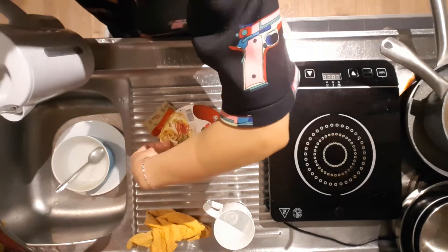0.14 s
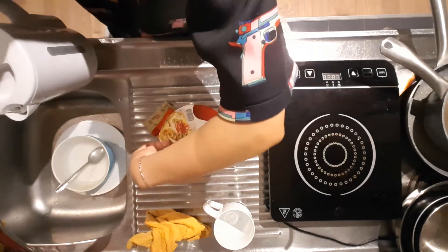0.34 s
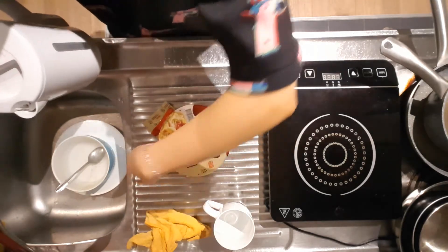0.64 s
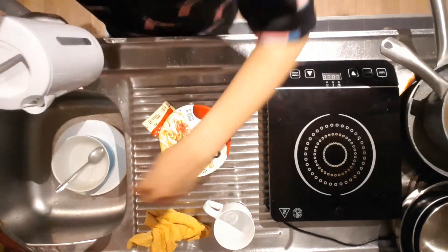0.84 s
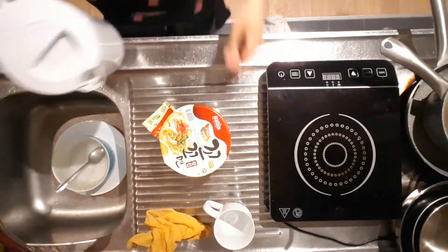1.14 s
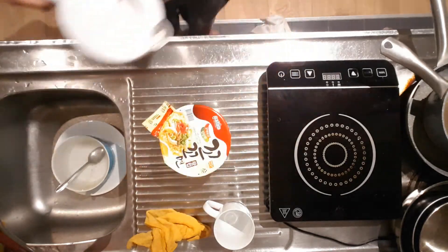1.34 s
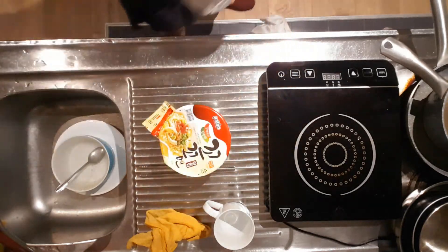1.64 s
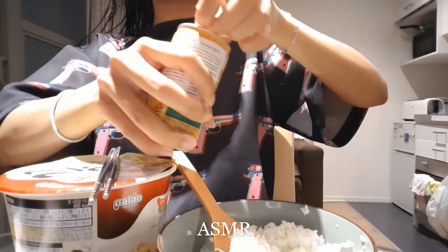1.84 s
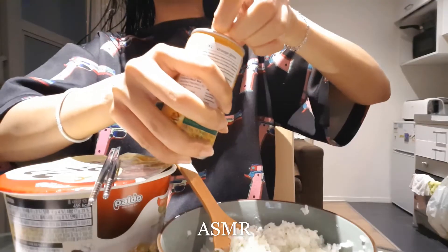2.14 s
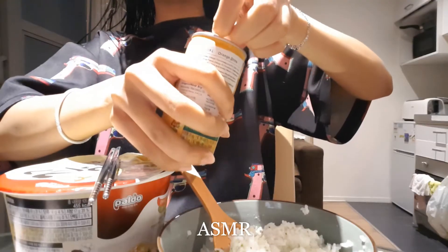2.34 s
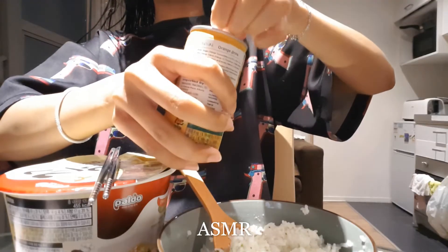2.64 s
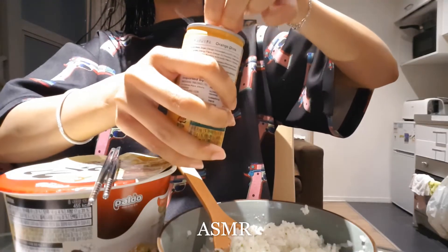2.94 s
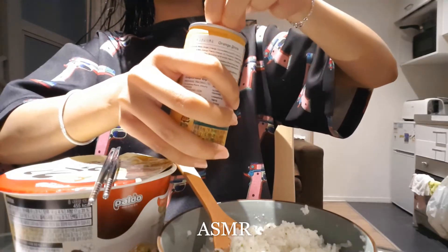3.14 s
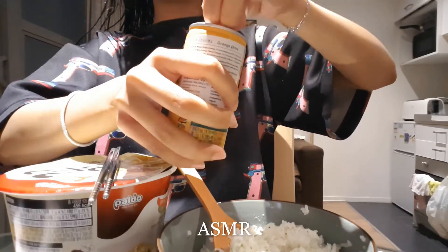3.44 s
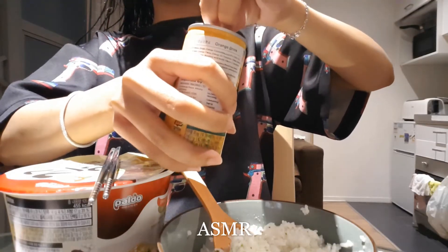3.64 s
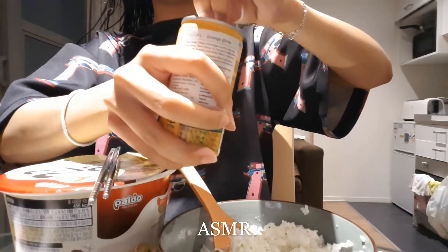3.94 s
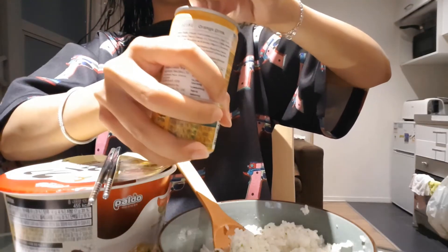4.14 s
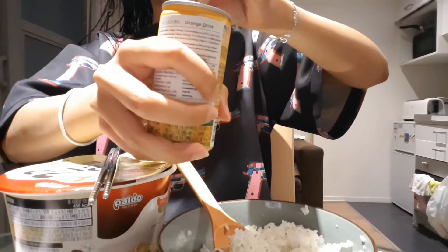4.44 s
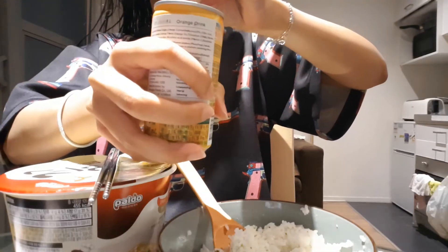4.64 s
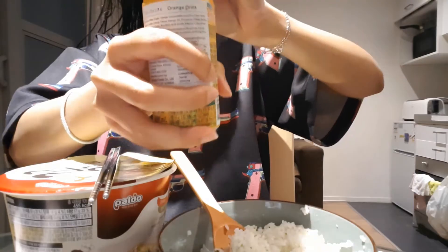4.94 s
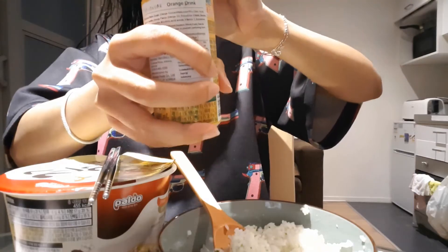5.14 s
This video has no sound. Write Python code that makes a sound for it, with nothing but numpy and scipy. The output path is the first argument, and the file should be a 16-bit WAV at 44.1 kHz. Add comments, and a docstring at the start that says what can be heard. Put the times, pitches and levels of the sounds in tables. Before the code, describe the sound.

From 0 to 1.8 s, a quiet kitchen sink: low room air, soft dull footfalls at the start and around 0.5-0.65 s, light foot scuffs and sleeve rustles, and thin whistling sizzle from a hot kettle, strongest at 1.0-1.4 s. A slightly clearer rustle and scuff come at 1.7 s, then the background fades quickly into a hushed table setting with faint low hum. At 2.37 s a sharp, bright metallic crack bursts very close, with a forceful gas jet lasting about 0.06 s, another click at 2.43 s and a wet fizz dying within half a second. Tiny ticks follow around 2.7-3.0 and 3.96 s as the hum rises slightly. At 4.37-4.41 s rapid crisp tearing snaps end in a loud, punchy pop with hollow can ring, close reflections and a short small-room tail. A very soft plink at 4.7 s, then near silence with faint room air slowly returning.

```python
"""Room air at a kitchen sink with soft footfalls, a rustling sleeve and the faint sizzle of a hot kettle (noise).
Then a drone and room air at a table, where a drink can is opened close to a stereo microphone.
The tab pricks the lid (noise bursts through resonances); gas jets out and dies away in a wet fizz (noise).
After faint ticks, two seconds later, the score line tears and the flap snaps in with a pop (bursts and
ringing sines), heard with near bounces and a small room; a soft plink follows."""
import sys
import numpy as np
from scipy import signal
from scipy.fft import rfft, irfft, next_fast_len
from scipy.io import wavfile

SR = 44100
rng = np.random.default_rng(int(sys.argv[2]) if len(sys.argv) > 2 else 0)


def wrap_up_sound(samples):
    """Save the sound to the file named by the first command line argument, as 16-bit audio."""
    columns = np.atleast_2d(samples).T
    # keep every value between -1 and 1, then stretch to whole-number steps
    tamed = np.clip(columns, -1, 1)
    steps = np.round(tamed * 32767).astype(np.int16)
    wavfile.write(sys.argv[1], SR, steps)


N = 232801
TIME = np.arange(N) / SR
POP_S = 4.4131


def from_db(db):
    """Decibels to amplitude gain."""
    return 10 ** (np.asarray(db) / 20)


def rms_one(x):
    """Scale to rms 1."""
    return x / np.sqrt(np.mean(x ** 2) + 1e-20)


def at_hz(points, hz):
    """Interpolate a table on a log-frequency axis."""
    points = np.array(points)
    return np.interp(np.log(np.maximum(hz, 1)), np.log(points[:, 0]), points[:, 1])


def colour(x, spectrum):
    """Causal minimum-phase filter with the given (hz, db) response, via the folded cepstrum."""
    size = 2 * next_fast_len(x.shape[-1])
    gain = from_db(at_hz(spectrum, np.fft.rfftfreq(size, 1 / SR)))
    cepstrum = irfft(np.log(gain))
    cepstrum[1:size // 2] *= 2
    cepstrum[size // 2 + 1:] = 0
    response = np.exp(rfft(cepstrum))
    return irfft(rfft(x, size) * response)[..., :x.shape[-1]]


def highpass(x, order, hz):
    """Butterworth bass cut."""
    return signal.sosfilt(signal.butter(order, hz, "high", fs=SR, output="sos"), x)


def ring(x, hz, t60_s):
    """Two-pole resonator: a unit click starts a decaying sine of initial height 1."""
    radius = np.exp(-np.log(1000) / (t60_s * SR))
    angle = 2 * np.pi * hz / SR
    poles = [1, -2 * radius * np.cos(angle), radius * radius]
    return signal.lfilter([0, np.sin(angle)], poles, x + 1e-18)


def resonate(x, modes):
    """Parallel bandpass resonances (hz, width_hz, peak_db); widths under 150 Hz are raised to 150."""
    out = 0
    for hz, width_hz, db in modes:
        radius = np.exp(-np.pi * max(width_hz, 150) / SR)
        poles = [1, -2 * radius * np.cos(2 * np.pi * hz / SR), radius * radius]
        peak_one = (1 - radius * radius) / 2
        out = out + from_db(db) * peak_one * signal.lfilter([1, 0, -1], poles, x + 1e-18)
    return out


def add(out, start_s, x):
    """Mix x into out from start_s."""
    start = max(round(start_s * SR), 0)
    out[..., start:start + x.shape[-1]] += x[..., :N - start]


def diffuse(spectrum):
    """Stereo noise from all around, rms 1, with left-right correlation set by frequency."""
    # left-right correlation of diffuse sound: hz, correlation
    likeness = [(100, 0.4), (400, 0.11), (1000, .3), (2500, 0.016), (15000, 0.018)]
    mid, side = rfft(rng.standard_normal((2, next_fast_len(N, True))))
    hz = np.linspace(0, SR / 2, len(mid))
    alike = np.clip(at_hz(likeness, hz), -1, 1)
    pair = np.sqrt(1 + alike) * mid + np.sqrt(1 - alike) * side * [[1], [-1]]
    return rms_one(irfft(pair * from_db(at_hz(spectrum, hz)))[:, :N])


def near_noise(size, alike):
    """White noise from the can: a shared part, and a part scattered by the hands to each side."""
    alike = np.clip(alike, 0, 1)
    shared = np.sqrt(alike) * rng.standard_normal(size)
    return shared + np.sqrt(1 - alike) * rng.standard_normal((2, size))


def flutter(rate_hz, depth_db):
    """Random gain: noise lowpassed at rate_hz, with an rms swing of depth_db."""
    lowpass = signal.butter(2, rate_hz, fs=SR, output="sos")
    return from_db(depth_db * rms_one(signal.sosfilt(lowpass, rng.standard_normal(N))))


def swell(start_s, db, attack_s, fall_db_per_s, hold_s=0):
    """Gain over time: linear attack, hold, then a steady fall in dB, by 200 dB at most."""
    age_s = TIME - start_s
    fall_db = np.minimum(fall_db_per_s * np.maximum(age_s - attack_s - hold_s, 0), 200)
    return np.clip(age_s / attack_s, 0, 1) * from_db(db - fall_db)


def together(gains):
    """Overlapping swells of one noise add in power."""
    return np.sqrt(sum(gain ** 2 for gain in gains))


def kettle_sizzle():
    """Steam noise through fluttering resonances swells each time the hot kettle's water sloshes."""
    # whistling resonances: hz, width_hz, relative_db
    whistles = [(4550, 150, -7), (7520, 300, -12), (8450, 170, -4), (10200, 180, -10), (11400, 820, -11.5),
                (13370, 260, -3), (13600, 1800, -9.5), (15700, 970, -4.5)]
    # sloshes: start_s, level_db
    sloshes = [(.515, -60), (.6, -57.5), (.94, -59), (1.0, -53.5), (1.16, -50), (1.37, -53)]
    steam = rng.standard_normal((2, N))
    sizzle = sum(resonate(steam, [mode]) * flutter(rate_hz=8.1, depth_db=2.5) for mode in whistles)
    sloshing = together(swell(s, db, attack_s=.034, fall_db_per_s=61) for s, db in sloshes)
    return sloshing * rms_one(sizzle)


def rubbing():
    """Friction noise, roughened by a fast flutter, as a sleeve brushes past and feet scuff the floor."""
    # sleeve and floor friction spectra: hz, relative_db
    rustle_colour = [(150, -15), (600, -5), (2000, 2.5), (4000, -1), (7000, -2.5), (9500, -12.5),
                     (12500, -8.5), (15500, -17)]
    scuff_colour = [(80, -23), (280, 4), (550, -2.5), (850, -5.5), (1400, -6.5), (2000, -7), (2900, -6.5),
                    (4500, -19.5), (9000, -36)]
    # sleeve brushes and foot scuffs: start_s, level_db, attack_s
    brushes = [(0, -71.5, 0.03), (.56, -63.5, 0.13), (1.143, -51, 0.038), (1.37, -64, 0.13),
               (1.695, -46, 0.039)]
    scuffs = [(.21, -73, 0.0058), (.49, -65, 0.022), (.58, -60.5, .06), (.99, -60, 0.039),
              (1.14, -60, 0.022), (1.691, -44, 0.0065)]
    brushing = together(swell(s, db, attack_s, fall_db_per_s=104) for s, db, attack_s in brushes)
    scuffing = together(swell(s, db, attack_s, fall_db_per_s=153) for s, db, attack_s in scuffs)
    friction = brushing * diffuse(rustle_colour) + scuffing * diffuse(scuff_colour)
    return flutter(rate_hz=45, depth_db=1.0) * friction


def footfalls():
    """Soft heel contacts, short smooth pulses, set floorboard modes ringing."""
    # footfalls: start_s, pulse_db
    steps = [(.003, -44.5), (0.506, -47.5), (0.599, -42), (.655, -47)]
    # floorboard modes: hz, gain_db, t60_s
    floorboards = [(118.4, -3, 0.3), (169, -1.5, 0.19)]
    heels, soft_contact = np.zeros(N), signal.windows.hann(SR // 200)
    for start_s, db in steps:
        add(heels, start_s, from_db(db) * soft_contact / soft_contact.sum())
    return sum(from_db(db) * ring(heels, hz, t60_s) for hz, db, t60_s in floorboards)


def at_the_sink(air_db=-61):
    """Sizzle, rubbing and footfalls over diffuse room air."""
    # room air spectrum: hz, relative_db
    sink_air = [(15, -49), (25, -3.5), (126, -4.5), (164, -2.5), (221, -12.5), (469, -12), (631, -19.5),
                (722, -17.5), (1710, -23), (4500, -29.5), (9300, -39.5), (15500, -30)]
    return kettle_sizzle() + rubbing() + footfalls() + from_db(air_db) * diffuse(sink_air)


def appliance_drone(rumble_db=2.5):
    """A kitchen appliance: steady sine partials plus low rumble noise under one level curve."""
    # drone level: time_s, level_db
    drone_level = [(2.0, -76), (3.05, -74), (3.25, -70), (4.4, -66), (4.52, -77.5)]
    # hum partials: hz, relative_rms_db
    partials = [(54, -7), (110.5, -3.5), (164.5, -0.5), (246, -3.5), (329, -0.5)]
    # rumble spectrum: hz, relative_db
    rumble_colour = [(15, -11), (50, 0.5), (120, -2.5), (300, -4.5), (450, -10.5), (800, -29),
                     (3000, -55.5)]
    hum = 0
    for hz, db in partials:
        phase_cycles = rng.random()
        hum = hum + from_db(db) * np.sqrt(2) * np.sin(2 * np.pi * (hz * TIME + phase_cycles))
    gain = from_db(np.interp(TIME, *np.transpose(drone_level)))
    return gain * (hum + from_db(rumble_db) * diffuse(rumble_colour))


def hush(depth_db=-11.5, fall_s=.1, hold_s=.57, recover_db_per_s=51.5):
    """Background gain: sinks at the pop, stays low for a while and swells back."""
    age_s = TIME - POP_S
    sunk_db = depth_db * np.clip(age_s / fall_s, 0, 1)
    regained_db = recover_db_per_s * np.maximum(age_s - fall_s - hold_s, 0)
    return from_db(np.minimum(sunk_db + regained_db, 0))


def at_the_table(air_db=-64.5):
    """Diffuse room air and the drone, both sinking for a while after the pop."""
    # room air spectrum: hz, relative_db
    table_air = [(15, -41), (25, -12), (113, -9.5), (193, -15.5), (233, -12.5), (297, -11), (340, -3),
                 (582, -11.5), (703, -14.5), (970, -15), (5580, -29.5), (9500, -34.5), (15500, -27.5)]
    return hush() * (from_db(air_db) * diffuse(table_air) + appliance_drone())


def gas_jet():
    """Turbulence noise: a full-pressure jet through the pinhole until liquid chokes it, then a thin leak."""
    # jet spectrum: hz, relative_db
    jet_colour = [(60, -40), (150, -21.5), (300, -13), (550, -11.5), (1000, -18), (2000, -1), (3100, -14),
                  (4500, -6), (5500, 1), (8000, -5.5), (12000, 2.5), (13500, -6.5), (15500, 0.5)]
    start_s, attack_s, hold_s = 2.364, .0096, .048
    jet = rms_one(colour(near_noise(N, alike=.43), jet_colour))
    full_pressure = swell(start_s, -18, attack_s, fall_db_per_s=3000.5, hold_s=hold_s)
    leak = swell(start_s, -41.5, attack_s, fall_db_per_s=330, hold_s=hold_s)
    return together([full_pressure, leak]) * jet


def wet_fizz():
    """Noise sputtering as liquid closes the slit: swells as the jet chokes, sinks with can pressure."""
    # fizz spectrum: hz, relative_db
    fizz_colour = [(80, -53.5), (400, -21), (1500, -19.5), (3200, -17.5), (3900, -8.5), (4600, -4),
                   (5200, -2), (5700, -10.5), (6300, -12), (7500, -23), (10000, -21.5), (15500, -22.5)]
    # short bursts in the fizz, the second an echo of the crack off the table: start_s, level_db
    bursts = [(2.426, -13), (2.4335, -15)]
    sputter = near_noise(N, alike=.45) * flutter(rate_hz=330, depth_db=1.5)
    fizz = rms_one(highpass(colour(sputter, fizz_colour), 2, 500))
    flows = [swell(2.395, -27.5, attack_s=.021, fall_db_per_s=118)]
    flows += [swell(s, db, attack_s=.0025, fall_db_per_s=4000) for s, db in bursts]
    return together(flows) * fizz


def gas():
    """The jet points a little left, the fizz a little right."""
    lean = from_db([[.7], [-.7]])
    return gas_jet() * lean + wet_fizz() / lean


def crumble(t, fade_s, snap, alike=.46):
    """A snap and a fading shower of tiny fractures, flattened towards an even spectrum."""
    fading = np.exp(-t / fade_s)
    force = rms_one(near_noise(len(t), alike) * fading) + snap * rms_one(1. * (t == 0))
    for _ in range(2):
        spectrum = rfft(force)
        flat = irfft(spectrum / (np.abs(spectrum) + 1e-9), len(t))
        force = flat * fading ** .2   # flattening spreads it in time; fade again
    return force


def lid(lowest_hz=900):
    """Bursts from the lid, and one echo of its tear, each direct and through the lid's resonances."""
    # breaks, ticks and, at 4.3925 s, the table's echo of the tear: start_s, level_db (over one ms),
    # crumble_ms (0.6 at least), tilt_db (per octave above 2 kHz), ring_db (relative to the direct sound)
    bursts = [(2.369, -8.5, 2.9, 1.5, 2), (2.4160, -20, .8, -5.5, 7.5), (2.4263, -11, 1.24, 0.5, 3),
              (2.7110, -49.5, 2.0, -15, -5), (2.758, -45, 3.1, -11, -2), (2.957, -36, 1.2, -3, -8),
              (3.9620, -46, 1.1, -5, 6), (4.2780, -58.5, 6.0, -3, 2.5), (4.3700, -26.5, 1.0, -0.5, -3),
              (4.3716, -18, 1.5, 2.5, -2), (4.3831, -7.5, 2.2, 0.5, 7), (4.3864, -12, 2.5, -1.5, 7.5),
              (4.3925, -16, 1.5, -2.5, 12), (4.4105, -14, 2.0, -6.5, 0.5)]
    # aluminium lid modes, damped by the fingers: hz, width_hz, relative_db
    lid_modes = [(1986.5, 300, -7.5), (3774, 130, 5.5), (4230, 300, 2), (5000, 360, 3), (5900, 500, -5),
                 (7400, 600, -9), (11946, 530, -8.5), (14700, 2500, -9)]
    out, t = np.zeros((2, N)), TIME[:SR // 10]
    one_ms = np.sqrt(SR / 1000 / len(t))   # rms that packs the energy of one ms at rms 1
    for start_s, db, crumble_ms, tilt_db, ring_db in bursts:
        force = crumble(t, max(crumble_ms, .6) / 1000, snap=.2)
        force = highpass(force, 2, lowest_hz)   # a small lid radiates little bass
        burst = rms_one(force) + from_db(ring_db) * rms_one(resonate(force, lid_modes))
        burst = colour(burst, [(2000, 0), (16000, 3 * tilt_db), (19000, -40)])
        add(out, start_s, from_db(db) * one_ms * rms_one(burst))
    return out


def pop(flap_db=.5, buckle_s=.0035):
    """The flap buckles inward: a crumbling burst, a suck then puffs of air, and ringing air in the can."""
    # flap spectrum: hz, relative_db
    flap_colour = [(100, -22.5), (300, -6.5), (500, -1), (850, -4.5), (1200, 2.5), (1450, -1), (1850, -5),
                   (3200, -1), (4000, -1), (6200, -7.5), (8000, -8), (9300, -15), (11000, -9.5),
                   (15000, -16.5)]
    # air shoved by the flap: delay_s, hz, level_db, t60_s, left_minus_right_db
    puffs = [(0, 540, 1.5, .005, -0.5), (.0009, 159.9, -9, 0.0096, 22.5), (.001, 106, -27.5, .07, 14)]
    # air above the drink: hz, level_db, t60_s
    cavity_modes = [(1160, -28, 0.054), (1330, -25, 0.17), (1468, -30.5, .08), (2970, -29.5, 0.16),
                    (3380, -30, .07)]
    # last soft plink in the can: start_s, hz, level_db, t60_s
    plink = (4.712, 1450, -59, .04)
    out, t = np.zeros((2, N)), TIME[:SR // 2]
    click = 1. * (t == 0)
    one_ms = np.sqrt(SR / 1000 / len(t))
    flap = highpass(colour(crumble(t, buckle_s, snap=0), flap_colour), 2, 600)
    add(out, POP_S, from_db(flap_db) * one_ms * rms_one(flap))
    for (delay_s, hz, db, t60_s, pan_db), sign in zip(puffs, (-1, 1, 1)):
        side_gain = from_db([[db + pan_db / 2], [db - pan_db / 2]])
        add(out, POP_S + delay_s, sign * ring(click, hz, t60_s) * side_gain)
    for hz, db, t60_s in cavity_modes:
        add(out, POP_S, from_db(db) * ring(click, hz, t60_s) * rng.choice([-1, 1]))
    start_s, hz, db, t60_s = plink
    add(out, start_s, from_db(db) * ring(click, hz, t60_s))
    return highpass(out, 1, 45)


def bounces(x):
    """The hands, the table and the nearest walls send back short, smeared, coloured copies."""
    # bounces: delay_s, spread_s, level_db (before colouring)
    near_surfaces = [(.001, .006, -10.5), (.0080, .004, -7.5), (0.0162, .007, -14)]
    # reflection spectrum: hz, gain_db
    bounce_colour = [(150, -17), (700, -8.5), (1300, -1), (5000, 2), (9000, -7.5), (15000, -9)]
    response = np.zeros((2, N))
    for delay_s, spread_s, db in near_surfaces:
        window = signal.windows.hann(int(spread_s * SR))
        smear = rng.standard_normal((2, len(window))) * window
        add(response, delay_s, from_db(db) * smear / np.linalg.norm(smear, axis=1, keepdims=True))
    response = colour(response[:, :SR // 10], bounce_colour)
    return signal.fftconvolve(x, response, axes=1)[:, :N]


def room(x, first_echo_s=.0055, build_s=.012):
    """Dense wall echoes: noise, different at each side, whose bands each fade at their own t60."""
    # reverberation spectrum: hz, gain_db
    room_gain = [(60, -24), (200, -25), (420, -26), (750, -11.5), (1400, -6.5), (4000, -5.5), (7000, -4.5),
                 (9500, -7.5), (15000, -5)]
    # reverberation time: hz, t60_s
    room_t60 = [(150, 0.33), (700, 0.17), (1500, 0.36), (4000, .33), (8000, 0.33), (15000, 0.29)]
    t = TIME[:SR * 3 // 4]
    hz = np.fft.rfftfreq(len(t), 1 / SR)
    echoes = rfft(rng.standard_normal((2, len(t))))
    centres_hz, tail = np.array(room_t60)[:, 0], 0
    build = np.clip((t - first_echo_s) / build_s, 0, 1)
    for share, (_, t60_s) in zip(np.eye(len(centres_hz)), room_t60):
        fading = np.exp(-np.log(1000) * t / t60_s) * build
        band = irfft(echoes * at_hz(np.c_[centres_hz, share], hz), len(t))
        tail = tail + band * fading / np.linalg.norm(fading)
    return signal.fftconvolve(x, colour(tail, room_gain), axes=1)[:, :N]


def scene(change_s=1.836, fade_out_s=.042, fade_in_s=.036, right_lag_samples=4):
    """The sink fades out and the table fades in; the can is a little nearer the left, with bounces and room."""
    left, right = lid() + gas()
    can = np.array([left, np.roll(right, right_lag_samples)]) + pop()
    sink = at_the_sink() * np.clip((change_s - TIME) / fade_out_s, 0, 1) ** 2
    table = at_the_table() * np.clip((TIME - change_s) / fade_in_s, 0, 1)
    side_gain = from_db([[-.4], [.4]])
    return side_gain * (can + bounces(can) + room(can) + sink + table)


def record(dry, ceiling=.78, cutoff_hz=15750):
    """Round the highest peaks below the ceiling, then cut the top steeply."""
    rounded = dry / (1 + (dry / ceiling) ** 4) ** (1 / 4)
    return signal.sosfilt(signal.ellip(12, .1, 80, cutoff_hz, fs=SR, output="sos"), rounded)


dry = scene()
out = record(dry)
wrap_up_sound(out)
```